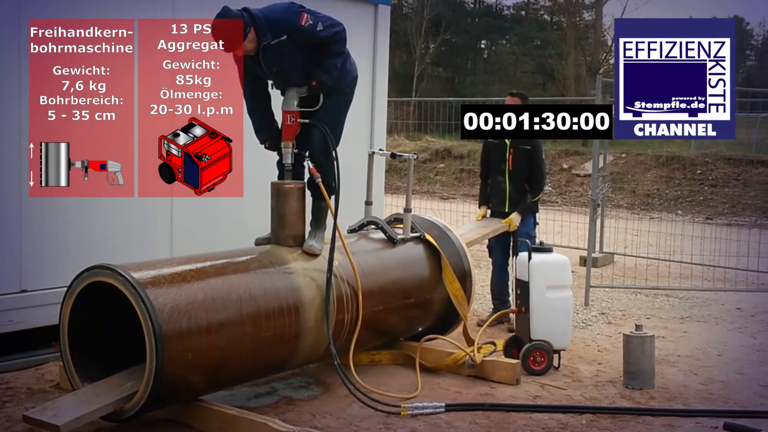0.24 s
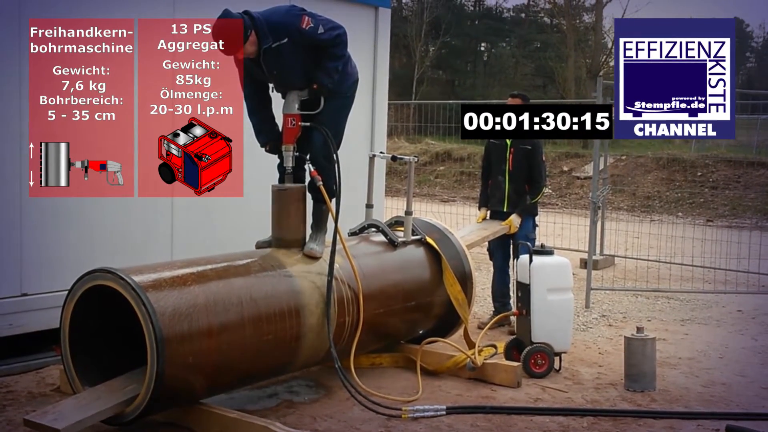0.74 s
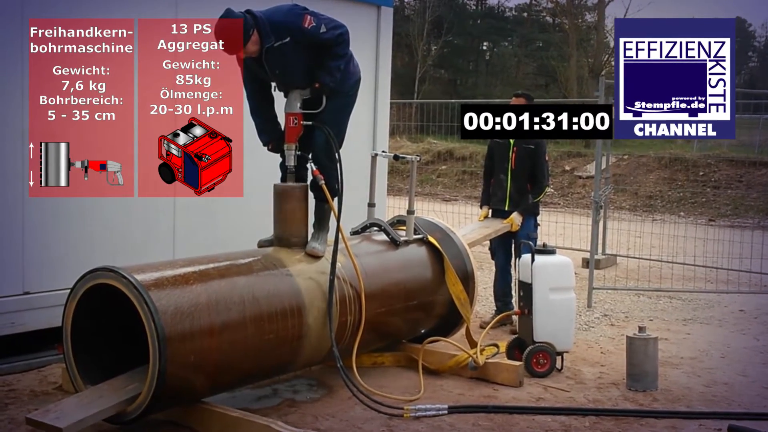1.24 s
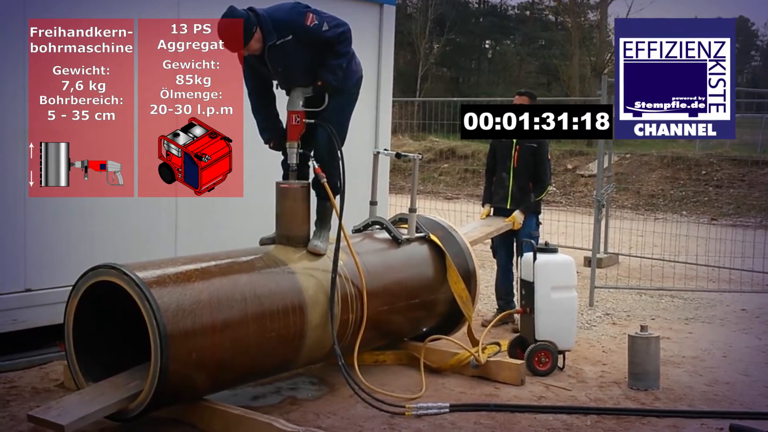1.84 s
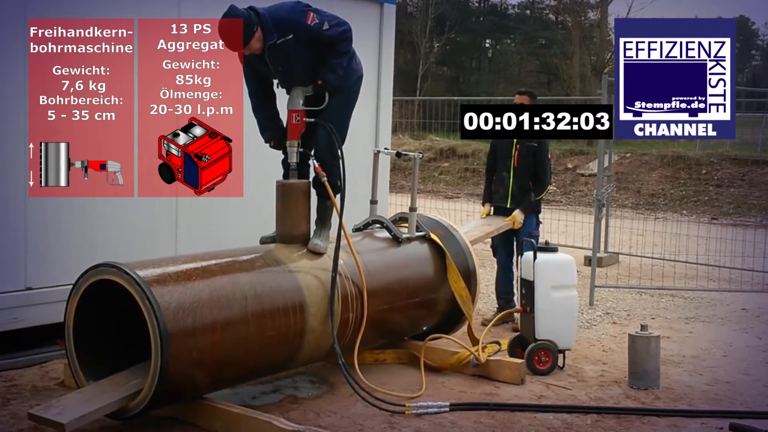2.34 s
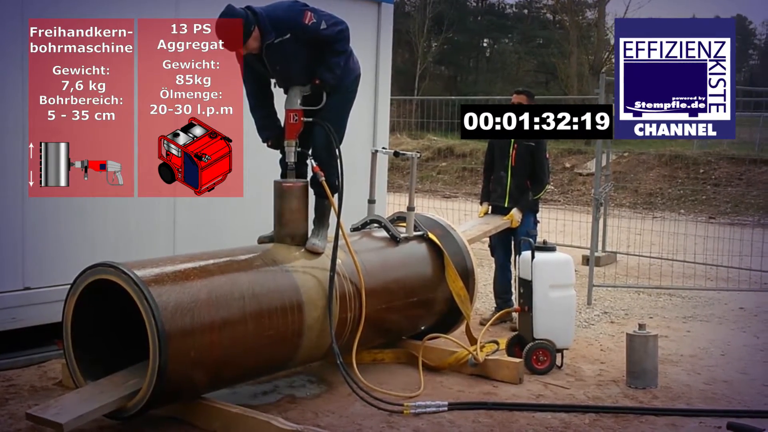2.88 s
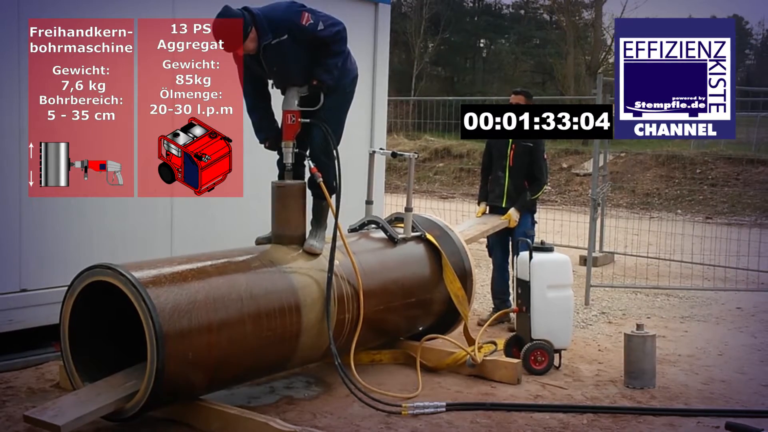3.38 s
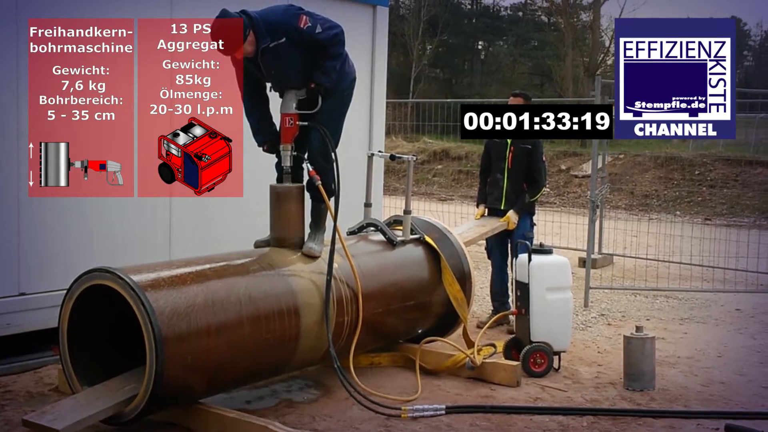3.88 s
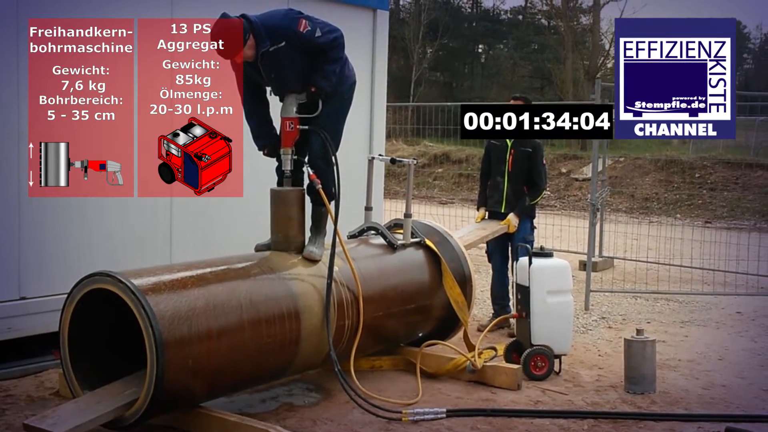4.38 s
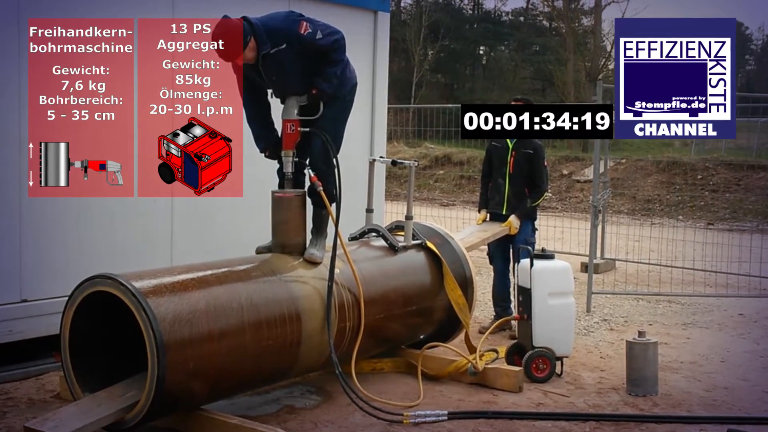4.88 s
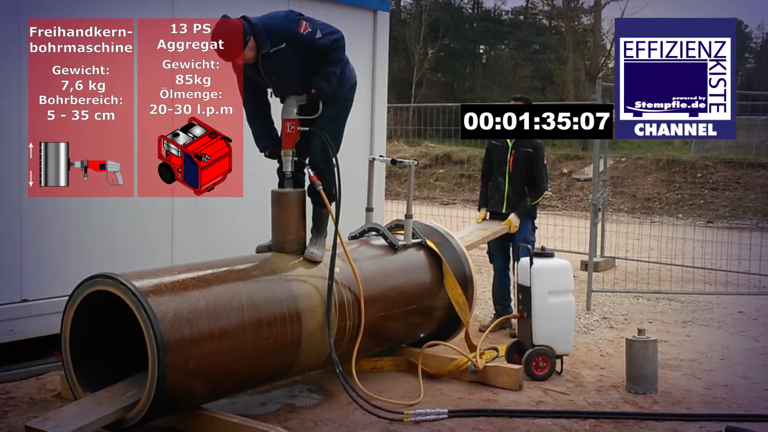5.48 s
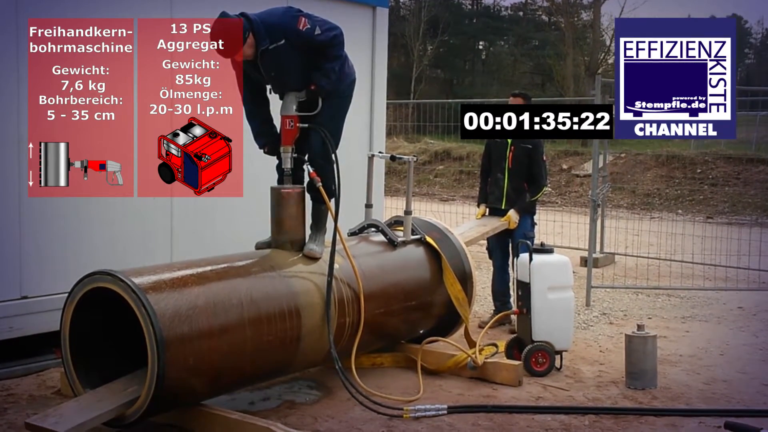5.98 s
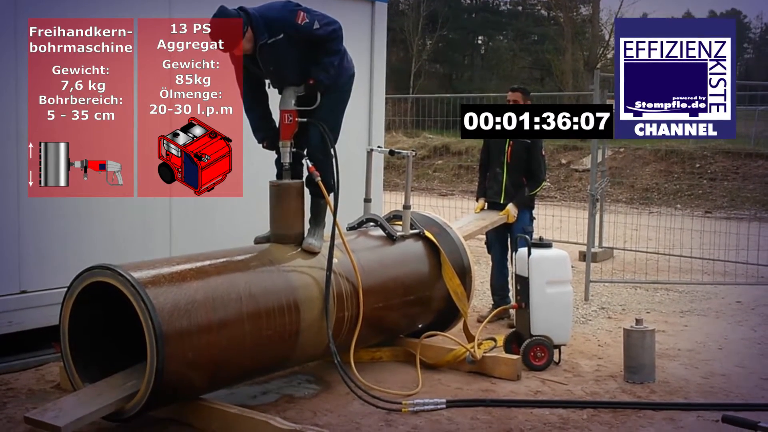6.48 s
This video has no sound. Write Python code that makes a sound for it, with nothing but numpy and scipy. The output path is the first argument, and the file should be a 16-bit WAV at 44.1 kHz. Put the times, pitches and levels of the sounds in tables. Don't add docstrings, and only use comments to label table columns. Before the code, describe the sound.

A steady engine drone with quick exhaust pulses, casing rumble and pump clatter runs throughout. Over it, drill teeth scrape hard ceramic, giving a dense, harsh hiss, pipe ringing in the mid treble and finer steel ringing above. The grind swells slightly with the push and brightens gradually; an airy whistle sinks in pitch. Close outdoor stereo, little echo, slightly grainy compressed camera sound with the highest treble cut off.

```python
import sys
import numpy as np
from scipy import signal
from scipy.fft import rfft, irfft, dct, next_fast_len
from scipy.io import wavfile
from scipy.ndimage import uniform_filter1d

SR = 44100
rng = np.random.default_rng(int(sys.argv[2]) if len(sys.argv) > 2 else 0)


def to_wav(s):
    ch = np.atleast_2d(s).T
    pcm = np.round(np.clip(ch, -1, 1) * 32767)
    wavfile.write(sys.argv[1], SR, pcm.astype(np.int16))


def attenuation_scalar(level_db):
    decades = np.asarray(level_db, float) / 20
    return 10 ** decades


N = 296793
SIZE = next_fast_len(N)
HZ = np.arange(SIZE // 2 + 1) * SR / SIZE


def level_curve(rows, hz):
    corner_hz, db = np.transpose(rows)
    return np.interp(np.log(hz + 1), np.log(corner_hz), db)


def lag(hz):
    # frequency in Hz, left lead in radians.
    port_lag = [(0, 0), (1030, 1.8), (1640, -1.1), (2930, -2.9), (3360, -3.0), (3620, -2.0), (4570, -2.1),
                (5000, -2.5), (6290, -3.5), (7150, -4.6), (10100, -5.3), (12000, -5.2), (13200, -3.9),
                (14800, -5.2)]
    return np.exp(-1j * np.interp(hz, *np.transpose(port_lag)))


def walk(rate_hz):
    place = np.arange(0, N + 64, 64) * rate_hz / SR
    value = rng.standard_normal(int(place[-1]) + 2)
    k = place.astype(int)
    ramp = .5 - .5 * np.cos(np.pi * (place - k))
    return 1.15 * np.repeat(value[k] + ramp * (value[k + 1] - value[k]), 64)[:N]


def ports(alike):
    left, other = rfft(rng.standard_normal((2, SIZE)))
    alike = np.clip(alike, 0, 1)
    right = alike * left * lag(HZ) + np.sqrt(1 - alike ** 2) * other
    return np.array([left, right])


def casing_rumble():
    # frequency in Hz, level in dB per Hz.
    rumble_rows = [(20, -24), (30, -14), (45, -10), (70, -14), (110, -2), (220, -6.5), (320, -4),
                   (420, -15)]
    edge = np.clip((420 - HZ) / 80, 0, 1)
    spectra = ports(0.56 + 0 * HZ) * attenuation_scalar(level_curve(rumble_rows, HZ)) * edge
    return attenuation_scalar(15.0) * irfft(spectra, SIZE)[:, :N]


def rattle(turn):
    # multiple of firing rate, level in dB.
    rattle_rows = [(15, -20), (16, -27.5), (17, -28.5), (18, -29.5), (19, -23.5), (20, -25), (21, -19.5),
                   (23, -33), (24, -25.5), (25, -21.5), (26, -19.5), (27, -25.5), (29, -32.5), (31, -26.5),
                   (32, -25), (35, -30.5), (36, -20), (38, -22.5), (39, -28), (40, -31), (42, -15),
                   (43, -27), (44, -22.5), (45, -25), (46, -31.5), (47, -35), (48, -31.5), (49, -28.5),
                   (50, -27), (51, -24.5), (53, -31), (58, -24), (59, -25), (70, -32), (71, -31), (73, -22),
                   (75, -25), (77, -26), (79, -33)]
    lean_db_per_multiple, lag_rad_per_multiple = .17, .042
    k, db = np.transpose(rattle_rows)
    cycle = np.linspace(0, 2 * np.pi, 4097)
    start_rad = 2 * np.pi * rng.random(len(k))
    tones = np.exp(1j * (np.outer(cycle, k) + start_rad)) * attenuation_scalar(db)
    lean_db = lean_db_per_multiple * k - 0.5
    right_gain = attenuation_scalar(-.7 * lean_db) * np.exp(-1j * lag_rad_per_multiple * k)
    shapes = (tones @ attenuation_scalar(.3 * lean_db)).real, (tones @ right_gain).real
    played = np.array([np.interp(turn % (2 * np.pi), cycle, shape) for shape in shapes])
    return attenuation_scalar(1.1) * attenuation_scalar(2.2 * walk(9)) * played


def exhaust(turn):
    # multiple of firing rate, level in dB.
    harmonics = [(1, -30), (2, -10), (3, -7.5), (4, -4), (5, 0.5), (6, -6), (7, -5.5), (8, -7), (9, -7),
                 (10, -14), (11, -14), (12, -6.5), (13, -25), (14, -16)]
    spread_rad, fire_rad, start_rad = -2.04, 4.65, .54
    out = 0
    for k, db in harmonics:
        wobble_rad = 0.006 * k * walk(3.5)
        phase = k * (turn + fire_rad) + spread_rad * k * k + start_rad + wobble_rad
        side = np.array([[attenuation_scalar(-1.9)], [attenuation_scalar(0.3) * lag(k * 25.0)]])
        out = out + attenuation_scalar(db + 0.054 * k * walk(4.9)) * (np.exp(1j * phase) * side).real
    return out


def kerf(time, level_db):
    # time in seconds, pitch in Hz, level in dB.
    glide = [(0, 1597, -12), (2.2, 1550, -2), (3.5, 1531, -4), (4.498, 1506, -2.5), (5.6, 1457, 0),
             (6.73, 1397, -4)]
    width_hz = 22
    s, hz, db = np.transpose(glide)
    keep = np.exp(-np.pi * width_hz / SR)
    breath = rng.standard_normal(N) + 1j * rng.standard_normal(N)
    air = signal.lfilter([1 - keep], [1, -keep], breath)
    phase = 2 * np.pi * np.cumsum(np.interp(time, s, hz)) / SR
    tone = air * np.exp(1j * phase) * attenuation_scalar(level_db + np.interp(time, s, db))
    return np.array([tone.real, (tone * lag(1500)).real])


def ring(modes, level_db, flicker_db, alike):
    out, bite = 0, rng.standard_normal((2, N))
    for hz, width_hz, left_db, right_db in modes:
        keep = np.exp(-np.pi * .7 * width_hz / SR)
        pole = keep * np.exp(2j * np.pi * hz / SR)
        left, other = signal.lfilter([1 - keep], [1, -pole], bite)
        right = (alike * left + np.sqrt(1 - alike ** 2) * other) * lag(hz)
        flicker = attenuation_scalar(flicker_db * (walk(8) + .8 * walk(1.5)))
        out = out + flicker * 2 * np.array([attenuation_scalar(left_db) * left.real, attenuation_scalar(right_db) * right.real])
    return out * attenuation_scalar(level_db)


def grit(pipe_db, barrel_db, turn):
    # frequency in Hz, level in dB per Hz.
    left_colour = [(420, -11.5), (700, -11), (1000, -8), (1500, -8), (1900, -2), (3150, -5.5), (4000, -3.5),
                   (4500, 3.5), (5100, -1.5), (7200, -5), (8000, -11), (9400, -10.5), (11000, -18.5),
                   (12800, -8), (14200, -7.5)]
    right_colour = [(420, -12.5), (700, -13.5), (1000, -10), (1400, -15.5), (2000, -9.5), (3000, -11.5),
                    (3600, -5.5), (4000, -3), (4800, -8), (6000, -6.5), (8300, -4), (10000, -3.5),
                    (11900, 4.5), (13000, -1.5), (14200, -4)]
    # frequency in Hz, share from 0 to 1.
    likeness = [(300, .75), (1100, .6), (1400, .2), (2600, .2), (2950, .6), (3450, .62), (4000, .25),
                (5400, .3), (5900, .6), (6400, .68), (9000, .5), (10000, .3), (14000, .2)]
    bit_turn_hz = 12.3
    colour = attenuation_scalar(np.array([level_curve(left_colour, HZ), level_curve(right_colour, HZ)]))
    noise = ports(level_curve(likeness, HZ)) * colour * np.clip((HZ - 340) / 80, 0, 1)
    throb = np.sin(2 * np.pi * bit_turn_hz * np.arange(N) / SR + 2.1 * walk(0.92))
    clatter = np.exp(-((turn / (2 * np.pi) - .14) % 1) / 0.16)
    scrape, out = walk(9), 0
    for step in np.arange(-6, 13):
        centre_hz = 1000 * 2 ** (step / 3)
        mask = np.cos(np.pi / 2 * np.clip(3 * np.log2(HZ / centre_hz + 1e-9), -1, 1))
        high = np.clip(step / 3 - 2, 0, 1)
        low = np.clip(.3 - step / 3, 0, 1)
        db = pipe_db + high * (barrel_db - pipe_db) + 0.72 * scrape
        db = db + (0.68 + 2.6 * low) * walk(11) + (0.45 + 0.25 * high) * throb
        clatter_db = (1 - high) * np.array([[3.8], [1.8]]) + .7 * high
        db = db + clatter_db * clatter * (step > 0)
        out = out + attenuation_scalar(db) * irfft(noise * mask ** 2, SIZE)[:, :N]
    return out


def scene():
    # time in seconds, firing rate in Hz.
    speed = [(0.0, 24.961), (0.396, 24.941), (0.792, 24.925), (1.188, 25.018), (1.584, 24.84),
             (1.979, 24.797), (2.375, 24.84), (2.771, 24.866), (3.167, 24.845), (3.563, 24.717),
             (3.959, 24.876), (4.355, 24.873), (4.751, 24.967), (5.146, 25.08), (5.542, 24.997),
             (5.938, 25.056), (6.334, 25.039), (6.73, 25.075)]
    # time in seconds, exhaust
    # level in dB.
    overall_level = [(0, -44), (.55, -47.5), (.9, -47), (1.17, -48.5), (1.4, -48), (2.2, -47.5), (2.9, -46),
                     (3.15, -47.5), (3.45, -46), (3.65, -47), (4.3, -47.5), (5.4, -49), (5.8, -48), (6.2, -49.5),
                     (6.73, -48.5)]
    # time in seconds, grind level in dB.
    feed = [(0, -0.5), (.4, 0.5), (.8, -0.5), (1.2, 0.5), (1.6, 0.5), (2.0, -0.6), (2.4, -0.3), (2.8, -0.5),
            (3.2, .5), (3.6, -0.7), (4.0, .3), (4.4, 0), (4.8, -0.5), (5.2, 0), (5.6, -0.5), (6.0, 0),
            (6.4, -1), (6.73, -1)]
    # frequency in Hz, width in Hz, left and right level in dB per Hz.
    pipe_modes = [(1227, 28, -9, -12), (1633, 29, 4, -4.5), (1766, 22, -1, -14), (2035, 112, -9, -10),
                  (2896, 50, -11, -11), (3348, 55, -6, -10), (3596, 76, 0, -3), (4425, 110, 3.5, -10),
                  (4640, 42, 9, -11), (4867, 73, 1, -17), (5383, 55, 0, -17), (5609, 41, -13, -2),
                  (5825, 120, -2, -7)]
    barrel_modes = [(6525, 120, -4, -11), (7149, 90, -6, -5), (7569, 46, -10, -10), (8000, 112, -19, -6),
                    (8538, 80, -17, -4), (9022, 120, -11, -2), (9270, 54, -18, -4), (9895, 120, -19, -2),
                    (10056, 70, -13, -1.5), (10357, 52, -22, 1), (10648, 130, -15, 3), (10982, 71, -19, -8),
                    (11499, 95, -18, 2), (11746, 40, -13, 9), (11990, 55, -14, 8.5), (12080, 34, -18, 8),
                    (12328, 118, -13, 6), (13081, 120, -11, -2), (13717, 48, -8, -8), (14147, 86, -6, -10)]

    time = np.arange(N) / SR
    firing_hz = np.interp(time, *np.transpose(speed))
    hunt_rad = .018 * walk(7)
    turn = 2 * np.pi * np.cumsum(firing_hz) / SR + hunt_rad
    exhaust_db = np.interp(time, *np.transpose(overall_level))
    feed_db = np.interp(time, *np.transpose(feed))
    extra_db = exhaust_db + 47.5
    pipe_db = -32 + 0.61 * extra_db + 0.26 * time + feed_db
    barrel_db = -32 + 0.27 * extra_db + 0.3449 * time + .8 * feed_db

    engine = attenuation_scalar(exhaust_db - 2.0) * (casing_rumble() + rattle(turn) + exhaust(turn))
    whistle = kerf(time, pipe_db)
    pipe = ring(pipe_modes, pipe_db + 1.5, flicker_db=1.5, alike=0.55)
    barrel = ring(barrel_modes, barrel_db + 2.5, flicker_db=0.7, alike=0.58)
    return engine + whistle + pipe + barrel + grit(pipe_db, barrel_db, turn)


def duck():
    start_s, in_s, hold_s, out_s, depth_db = 1.66, 0.1, 0.17, 0.13, -2
    corners_s = start_s + np.cumsum([0, in_s, hold_s, out_s])
    return attenuation_scalar(depth_db * np.interp(np.arange(N) / SR, corners_s, [0, 1, 1, 0]))


def side_notches():
    # frequency in Hz, width in Hz, depth in dB.
    dips = [
        [(3150, 200, -1.5), (6280, 130, -3), (9420, 200, -4), (10850, 150, -1), (11130, 150, -1.5), (11620, 150, -3), (12850, 200, -4), (430, 50, -4)],
        [(1390, 50, -7), (1880, 70, -4), (4010, 100, -5), (4800, 120, -4), (5500, 80, -3), (6280, 130, -1.5), (430, 50, -4)],
    ]
    top_hz = 14560
    notch_db = np.array([sum(db * np.exp(-((HZ - hz) / width_hz) ** 2) for hz, width_hz, db in side)
                         for side in dips])
    return attenuation_scalar(notch_db) * attenuation_scalar(-.28 * np.clip(HZ - top_hz + 60, 0, 300))


def round_lines(x):
    # frequency in Hz, step over block loudness in dB.
    step_rows = [(100, -30), (330, -29), (430, -26), (700, -22.5), (1200, -11), (1600, -7), (2200, -2),
                 (3100, 1.5), (4000, 2), (5200, 1.5), (7200, 1), (8500, -1.5), (14500, -2.5)]
    block, grid, band = 1024, 501, 16
    jitter_db, joint_step_db, joint_bias, round_up = 1.9, -.7, 1.25, .4
    blocks, half = N // block + 3, block // 2

    x = np.pad(x, ((0, 0), (block - grid, blocks * block - N - block + grid)))
    x = x.reshape(2, blocks, 2, half)
    window = np.sin(np.pi * (np.arange(2 * block) + .5) / (2 * block)).reshape(4, half)
    frames = np.concatenate([x[:, :-1], x[:, 1:]], axis=2) * window
    a, b, c, d = np.moveaxis(frames, 2, 0)
    folded = np.concatenate([-c[..., ::-1] - d, a - b[..., ::-1]], axis=2)
    lines = dct(folded, type=4, norm="ortho").reshape(2, blocks - 1, -1, band)

    def weaker(pair):
        power = np.mean(pair ** 2, axis=3, keepdims=True)
        return uniform_filter1d(power, size=3, axis=1).min(axis=0)

    summed = np.array([lines[0] + lines[1], lines[0] - lines[1]]) / 2
    joint = 2 * weaker(summed) < joint_bias * weaker(lines)

    hz = (np.arange(block // band) + .5) * band * SR / 2 / block
    loud = uniform_filter1d(np.sqrt(np.mean(lines ** 2, axis=(0, 2, 3))), size=9)
    draws = rng.standard_normal((2, blocks - 1, len(hz), 4))
    jump_db = jitter_db * 1.4 * uniform_filter1d(draws, size=2, axis=1)
    narrow = abs(hz[:, None] - 700) < 400
    jump_db = np.where(narrow, 3.2 * jump_db, jump_db[..., :1])
    jump_db = np.repeat(jump_db, band // 4, axis=3)
    step = loud[:, None, None] * attenuation_scalar(level_curve(step_rows, hz)[:, None] + jump_db)
    step = step * attenuation_scalar(joint_step_db * joint) + 1e-12

    kept = np.where(joint, summed, lines)
    kept = np.sign(kept) * np.floor(np.abs(kept) / step + round_up) * step
    kept = np.where(joint, [kept[0] + kept[1], kept[0] - kept[1]], kept)
    u, v = np.split(dct(kept.reshape(2, blocks - 1, block), type=4, norm="ortho"), 2, axis=2)
    parts = np.stack([v, -v[..., ::-1], -u[..., ::-1], -u], axis=2) * window
    gap = np.zeros((2, 1, 2, half))
    out = np.concatenate([parts[:, :, :2], gap], axis=1)
    out = out + np.concatenate([gap, parts[:, :, 2:]], axis=1)
    return out.reshape(2, -1)[:, block - grid:][:, :N]


def roll_off(x):
    return signal.sosfilt(signal.butter(12, 15270, fs=SR, output="sos"), x)


def record(dry):
    heard = duck() * irfft(rfft(dry, SIZE) * side_notches(), SIZE)[:, :N]
    mix = round_lines(heard)
    return roll_off(mix)


dry = scene()
out = record(dry)
to_wav(out)
```